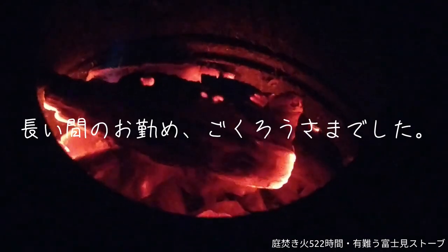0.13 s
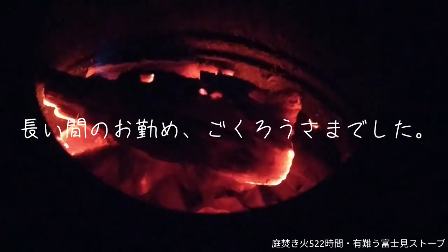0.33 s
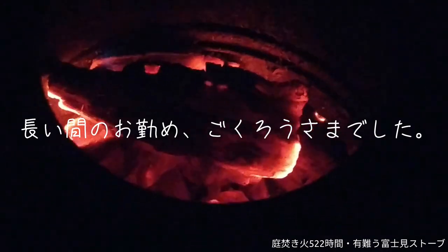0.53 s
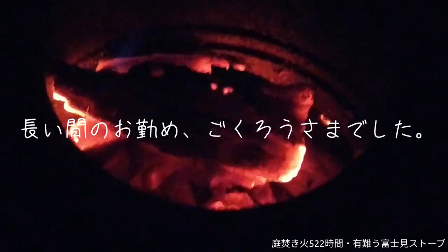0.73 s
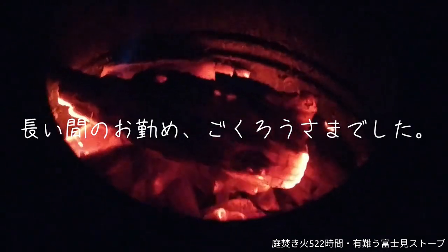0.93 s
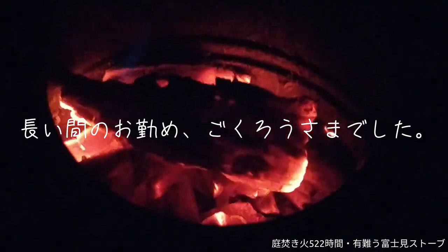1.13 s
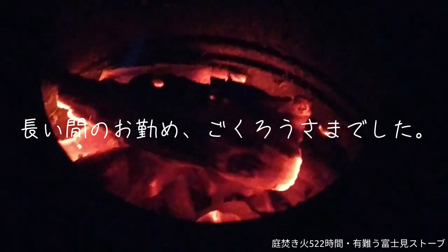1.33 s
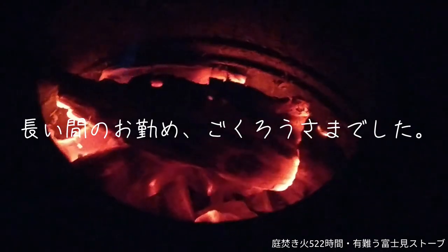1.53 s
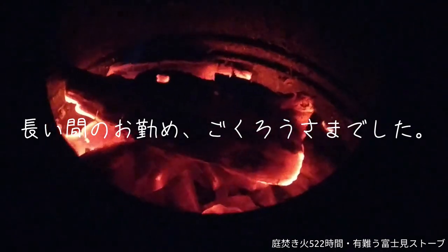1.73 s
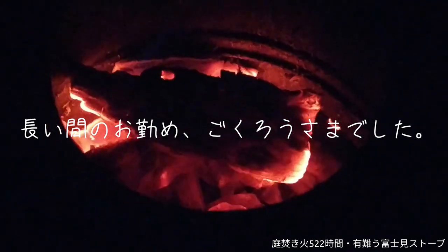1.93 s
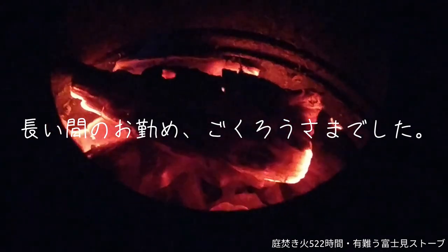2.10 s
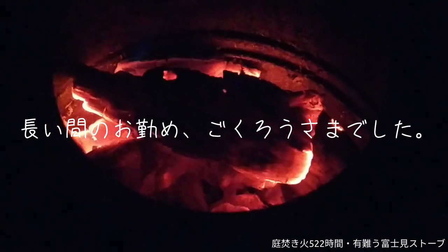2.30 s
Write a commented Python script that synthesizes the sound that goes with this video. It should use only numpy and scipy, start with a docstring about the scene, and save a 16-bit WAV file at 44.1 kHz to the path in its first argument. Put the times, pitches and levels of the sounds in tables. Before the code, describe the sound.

A wood fire crackles in a small stove, heard from very close. After a short clinking slide of charcoal comes one loud snap, then a few lighter ones. Embers tick faintly while the draught rumbles and hisses softly throughout.

```python
"""Burning wood cracks in a small steel stove, close to a pair of microphones: one sharp pop, a few smaller
ones and faint ticks throughout. Each pop is a snap, a rattle round the firebox and the ring of the split
piece. Early on the charcoal shifts: it scrapes, tinkles and knocks against the steel, which rings thinly.
Underneath lies a steady bed of draught, rumbling, booming in the flue and hissing over the embers."""
import sys
import numpy as np
from scipy import signal
from scipy.fft import rfft, irfft, next_fast_len
from scipy.io import wavfile
from scipy.ndimage import map_coordinates

SR = 44100
rng = np.random.default_rng(int(sys.argv[2]) if len(sys.argv) > 2 else 0)


def dump_mix(stems):
    """Bounce the given channels to the path in sys.argv[1] as a 16-bit WAV at rate SR."""
    frames = np.atleast_2d(stems).T  # one column per channel
    limited = np.clip(frames, -1, 1)  # hard clip at full scale
    pcm = np.round(limited * 32767).astype(np.int16)
    wavfile.write(sys.argv[1], SR, pcm)


N = 104120

# low end of the draught: (frequency [Hz], relative level [dB])
RUMBLE_EQ = [(12, -41), (20, 1.5), (38, -1.5), (76, -5), (107, -6.5), (136, -8.5), (167, -5.5),
             (223, -12.5), (264, -11), (361, -23), (450, -24), (580, -55), (990, -120)]
# air over the coals: (frequency [Hz], left [dB], right [dB])
HISS_EQ = [(350, -2, -10), (530, 1, 1), (648, -8.5, -4.5), (770, -2.5, -1.5), (1220, -7, -1.5),
           (1580, -11, -6.5), (2320, -16.5, -2), (3330, -20.5, -17), (4650, -23.5, -16),
           (5500, -24.5, -18.5), (6640, -24.5, -14), (8360, -22.5, -21), (14100, -21, -21.5)]
# stereo image of the draught: (frequency [Hz], left-right correlation [-1..1])
DRAUGHT_IMAGE = [(60, 0.95), (180, 0.92), (540, 0.33), (1640, -0.41), (4930, 0.18), (14800, 1)]
# resonances of the firebox and flue: (frequency [Hz], left [dB], right [dB])
FLUE_MODES = [(32.2, 0.5, -1), (114.1, -3.5, -2.5), (162.5, -8, -4.5)]
# envelope of the charcoal sliding on the steel: (time [s], level [dB])
SLIDE_ENVELOPE = [(0, -40), (.04, -81), (.075, -60), (.16, -61.5), (.185, -52), (.235, -59.5), (.255, -46),
                  (.305, -46.5), (.335, -39), (.368, -46.5), (.382, -64), (.40, -75), (.44, -100)]
# tone of the scraping: (frequency [Hz], left [dB], right [dB])
SCRAPE_EQ = [(710, -17, -25), (1720, -29, -20.5), (2490, -15.5, -4), (2930, -24, -15), (3450, -16, -8.5),
             (4700, -19.5, -11.5), (5160, -17.5, -3), (5930, -10, -24.5), (6550, -10, -2),
             (7150, -13.5, -12.5), (8940, -8, -9), (9600, -16, -22), (10870, -8, -14), (11140, -17, -27),
             (11860, -3.5, -16), (13000, -21, -22), (13600, -10, -20), (14300, -25, -29)]
# resonances of the stove's steel: (frequency [Hz], left [dB], right [dB])
STEEL_MODES = [(3296, -10.5, 0.5), (4030, -22, 1.5), (4312, -18, -7), (5090, -14, 0), (6630, -5, -0.5),
               (7370, -12, 1), (8400, -11, -11), (8965, -7, -10), (9230, 3, 3.5), (9950, 2, -11),
               (10885, 1.5, -21), (11700, -6, -8), (11800, -5, -6)]
# charcoal hitting the steel:
# (time [s], level [dB], t60 [s], treble tilt [dB/octave], favoured pitch [Hz], steel ring [dB])
CHARCOAL_KNOCKS = [(0.0804, -35.5, 0.033, 2, 8500, -65), (.1236, -49, 0.033, 7, 12400, -63.5),
                   (0.173, -63, 0.034, 5, 10000, -62.5), (0.211, -38, 0.047, -1.5, 6450, -56.5),
                   (0.2456, -31, 0.074, -4, 3740, -49), (0.3145, -40, 0.019, -11, 2530, -62),
                   (0.3227, -40, 0.033, 8.5, 9100, -63), (0.3481, -34, 0.052, 4, 10850, -54)]
# wood splitting: (time [s], level [dB], t60 [s], attack [s], pitch of the piece [Hz],
# its relative ring [dB], treble tilt [dB/octave], shelf above 10 kHz [dB])
WOOD_POPS = [(0.033, -28.5, 0.014, 0.00011, 6270, 0.5, 5, 4.5),
             (0.4125, -11.5, 0.022, 0.00015, 5930, -5, 1.5, -4),
             (0.599, -41, 0.035, 0.00018, 2860, -0.5, -8, 18),
             (0.7458, -28.5, 0.026, .00015, 4530, -7, -5, 9.5),
             (0.9244, -36.5, 0.032, .0002, 6800, -17, 8.5, 1.5),
             (1.0975, -29, 0.032, .0002, 7540, -2.5, 3, 8),
             (1.1019, -25.5, .022, 0.00011, 2300, -16.5, 2.5, 2),
             (1.3193, -43.5, 0.039, 0.002, 6450, -2, 4.5, 3), (1.345, -46.5, .025, .0008, 7450, -10, 7, 3),
             (1.9536, -44, 0.018, .0003, 6620, -1.5, 7, 2), (2.134, -47.5, 0.025, .0005, 8000, 0, 15, 0),
             (2.161, -46.5, 0.045, 0.0027, 5970, -2, 11, -4)]
# tone of a pop leaving the stove: (frequency [Hz], left [dB], right [dB])
POP_EQ = [(800, -36, -53), (1500, -36, -25.5), (2300, -41, -9.5), (2860, -21, -4), (3310, -27, -13),
          (4550, -19, -3.5), (5150, -29, -7.5), (6000, -17, -6.5), (6650, -19, -4), (7930, -20.5, -10),
          (11050, -23.5, -23), (12300, -18.5, -17.5), (13400, -22.5, -20.5)]

CRACK_ATTACK_S, KNOCK_ATTACK_S, STEEL_T60_S = 0.00011, 0.00085, 0.26
PRESS_S, PRESSED_T60_S = 0.32, 0.06  # the charcoal presses down and chokes earlier clinks
REST_S, REST_T60_S = 0.38, 0.32  # it comes to rest and stills the steel
TOP_HZ = 14350


def amp(db):
    """Decibels to gain."""
    return 10 ** (np.asarray(db) / 20)


def rms(x):
    """Average signal level."""
    return np.sqrt(np.mean(x ** 2) + 1e-20)


def unit(x):
    """Normalise to rms 1."""
    return x / rms(x)


def curve_at(table, hz):
    """Read a table's columns along a log frequency axis."""
    freqs, *columns = np.transpose(table)
    return np.array([np.interp(np.log(hz + 1), np.log(freqs + 1), column) for column in columns])


def filtered(x, response):
    """Zero-phase filter with gain response(hz)."""
    n = x.shape[-1]
    size = next_fast_len(n + 8192)
    return irfft(rfft(x, size) * response(np.fft.rfftfreq(size, 1 / SR)), size)[..., :n]


def equalise(x, eq, tilt_db=0, shelf_db=0, size=1024):
    """Unit-power stereo EQ with a treble tilt per octave, a 10 kHz shelf and a bass roll-off."""
    hz = np.fft.rfftfreq(size, 1 / SR) + 1
    tilt = tilt_db * np.log2(np.clip(hz, 2000, 14000))
    shelf = shelf_db / (1 + (10000 / hz) ** 12)
    gain = amp(curve_at(eq, hz) + tilt + shelf) * hz / (hz + 300)
    cepstrum = irfft(np.log(unit(gain) + 1e-6))
    cepstrum[:, 1:size // 2] *= 2  # fold to minimum phase: no pre-ring on the transients
    cepstrum[:, size // 2 + 1:] = 0
    impulse = irfft(np.exp(rfft(cepstrum)))
    return signal.fftconvolve(x, impulse, axes=1)[:, :x.shape[1]]


def resonate(x, modes, t60):
    """Play mono x through a unit-power stereo bank of decaying modes."""
    t = np.arange(SR // 2) / SR
    tones = sum(amp([[left], [right]]) * np.sin(2 * np.pi * (hz * t + rng.random()))
                for hz, left, right in modes)
    impulse = unit(tones * amp(-60 * t / t60)) / np.sqrt(len(t))
    return signal.fftconvolve(x[None], impulse, axes=1)[:, :N]


def stereo_noise(n, correlation=0.48):
    """White noise, partly shared by the two microphones."""
    mid, side = rng.standard_normal((2, n))
    width = np.arccos(correlation) / 2
    return np.cos(width) * mid + np.sin(width) * np.array([side, -side])


def strike(t, attack, t60):
    """Percussive envelope: quick rise, exponential fall."""
    return (1 - np.exp(-t / attack)) * amp(-60 * t / t60)


def add(out, start_s, x):
    """Mix x into out at start_s."""
    i = round(start_s * SR)
    out[:, i:i + x.shape[1]] += x[:, :max(N - i, 0)]


def airflow(eq, low_cut_hz):
    """Rushing air: steady noise of rms 1 whose stereo width varies with frequency."""
    def mid_side_gains(hz):
        width = np.arccos(curve_at(DRAUGHT_IMAGE, hz)[0]) / 2
        return np.array([np.cos(width), np.sin(width)])

    def tone(hz):
        low_cut = 1 - np.exp(-(hz / low_cut_hz) ** 4)
        return amp(curve_at(eq, hz)) * low_cut * (hz < TOP_HZ)

    mid, side = filtered(rng.standard_normal((2, N)), mid_side_gains)
    return unit(filtered(np.array([mid + side, mid - side]), tone))


def draught():
    """Air drawn through the stove rumbles, booms in the flue and hisses over the coals."""
    lean_right = amp([[-1.54], [1.54]])
    rumble = amp(-52) * lean_right * airflow(RUMBLE_EQ, low_cut_hz=7.9)
    boom = amp(-57) * unit(resonate(rng.standard_normal(N), FLUE_MODES, t60=0.45))
    boom = filtered(boom, lambda hz: np.exp(-(hz / 300) ** 4))
    hiss = amp(-60.5) * airflow(HISS_EQ, low_cut_hz=412)
    return rumble + boom + hiss


def shifting_charcoal(grit_db=7, grains_per_s=500):
    """A gritty slide and a run of knocks rasp, set the flakes tinkling and ring the steel."""
    time, t = np.arange(N) / SR, np.arange(SR // 8) / SR
    slide = amp(np.interp(time, *np.transpose(SLIDE_ENVELOPE)))
    noise = stereo_noise(N)
    grit = map_coordinates(rng.standard_normal(8192), [time * grains_per_s], mode="wrap")  # smooth jitter
    friction = unit(noise * amp(grit_db * grit)) * slide
    rasp = equalise(friction, SCRAPE_EQ)
    steel = amp(-9) * resonate(friction[0], STEEL_MODES, STEEL_T60_S)
    pressure = np.array([slide])
    for start_s, db, t60, tilt_db, favoured_hz, ring_db in CHARCOAL_KNOCKS:
        push = amp(db) * strike(t, KNOCK_ATTACK_S, t60)
        add(pressure, start_s, push[None])
        add(rasp, start_s, equalise(push * stereo_noise(len(t)), SCRAPE_EQ, tilt_db))
        add(steel, start_s, amp(ring_db) * steel_clink(start_s, favoured_hz))
    settling = amp(-60 * np.maximum(time - REST_S, 0) / REST_T60_S)
    return amp(-3) * rasp + amp(-6) * flake_tinkle(pressure[0]) + steel * settling


def flake_tinkle(pressure, pings_per_s=1700, spread_db=3):
    """Brittle flakes of charcoal ping at random pitches, as loudly as they are pressed."""
    out, t = np.zeros((2, N)), np.arange(SR // 10) / SR
    envelope = strike(t, CRACK_ATTACK_S, t60=0.033)
    count = int(pings_per_s * SLIDE_ENVELOPE[-1][0])
    for k, (jitter, pitch, softness, side) in enumerate(rng.random((2048, 4))[:count]):
        start_s = (k + jitter) / pings_per_s
        hz = 1800 + 12400 * pitch
        gain = pressure[int(start_s * SR)] * amp(-spread_db * np.log(0.03 + softness))
        stereo_phase = np.array([[0], [side - 0.5]])
        add(out, start_s, gain * envelope * np.sin(2 * np.pi * (hz * t + stereo_phase)))
    return unit(equalise(out, SCRAPE_EQ)) * rms(pressure)


def wood_pops(snap_s=0.0002, snap_db=-5):
    """Each crack is a direct snap, its rattle round the firebox and the brief ring of the split piece."""
    out, t = np.zeros((2, N)), np.arange(SR // 8) / SR
    snap_at = round(snap_s * SR)
    pan_right = amp([[-20], [0]])
    for start_s, db, t60, attack, hz, ring_db, tilt_db, shelf_db in WOOD_POPS:
        envelope = strike(t, attack, t60)
        crack = stereo_noise(len(t)) * envelope
        crack[:, snap_at] += amp(snap_db) * np.linalg.norm(envelope) * envelope[snap_at]
        burst = unit(equalise(crack, POP_EQ, tilt_db, shelf_db)) * rms(envelope)
        ring = np.sin(2 * np.pi * hz * t) * strike(t, attack, t60=0.019) * pan_right
        add(out, start_s, amp(db) * (burst / 2 + amp(ring_db) * ring))
    return out


def ember_ticks(ticks_per_s=40, level_db=-61.5, spread_db=2):
    """Tiny cracks at random moments all over the ember bed."""
    t = np.arange(SR // 32) / SR
    triggers = rng.random(N) < ticks_per_s / SR
    gains = amp(level_db + spread_db * np.clip(rng.standard_normal(N), -2, 2))
    envelope = signal.fftconvolve(triggers * gains, strike(t, CRACK_ATTACK_S, t60=0.013))[:N]
    return equalise(stereo_noise(N) * envelope, POP_EQ, tilt_db=4)


def steel_clink(start_s, favoured_hz, boost_db=13.5, width_hz=790, spread_db=2.5):
    """Knocked steel rings: each spot favours some modes, and charcoal pressing down damps them."""
    t, ring = np.arange(SR // 3) / SR, 0
    for hz, left_db, right_db in STEEL_MODES:
        emphasis_db = boost_db * np.exp(-((hz - favoured_hz) / width_hz) ** 2)
        emphasis_db += spread_db * rng.standard_normal()
        gain = amp(emphasis_db) * amp([[left_db], [right_db]])
        ring = ring + gain * np.sin(2 * np.pi * (hz * t + rng.random((2, 1))))
    struck_before_press = start_s < PRESS_S - PRESSED_T60_S / 2
    pressed_s = np.maximum(start_s + t - PRESS_S, 0) * struck_before_press
    return ring * strike(t, KNOCK_ATTACK_S, STEEL_T60_S) * amp(-60 * pressed_s / PRESSED_T60_S)


def shell_echo(x, tilt_db=4.5):
    """Countless close resonances of the stove's shell die together in a short, bright tail."""
    t = np.arange(SR // 3) / SR
    impulse = stereo_noise(len(t)) * strike(t, attack=0.002, t60=0.17)
    tail = signal.fftconvolve(x, impulse / np.linalg.norm(impulse[0]), axes=1)[:, :N]
    return filtered(tail, lambda hz: amp(tilt_db * np.log2((hz + 500) / 6000)))


def scene():
    """Pops, ticks and charcoal up front with a touch of stove echo, over the bed of draught."""
    embers = wood_pops() + ember_ticks() + shifting_charcoal()
    return embers + amp(-21) * shell_echo(embers) + draught()


def record(dry):
    """A steep high cut on the whole mix."""
    return filtered(dry, lambda hz: 1 / np.sqrt(1 + (hz / TOP_HZ) ** 160))


dry = scene()
out = record(dry)
dump_mix(out)
```